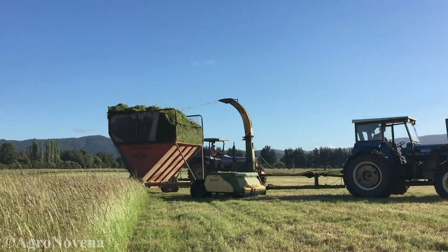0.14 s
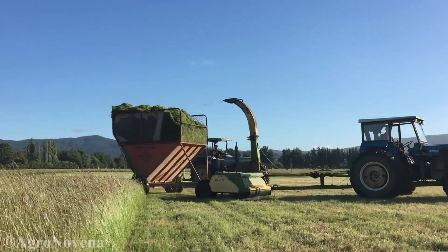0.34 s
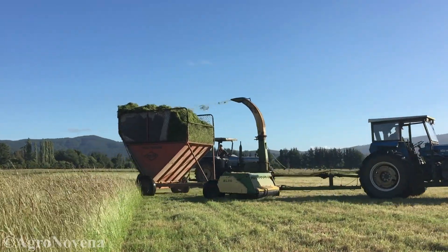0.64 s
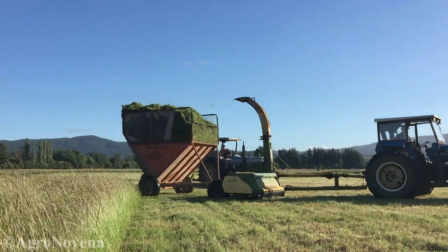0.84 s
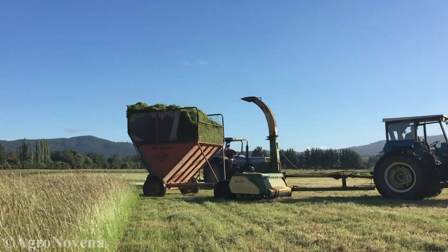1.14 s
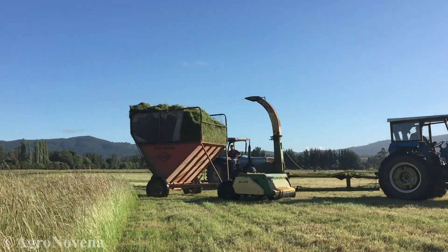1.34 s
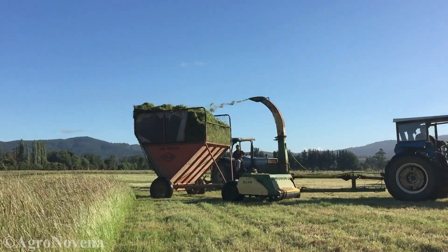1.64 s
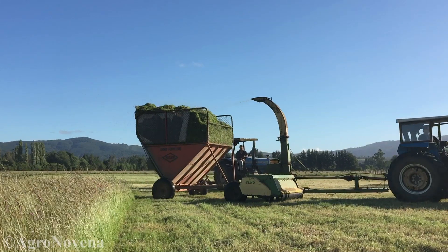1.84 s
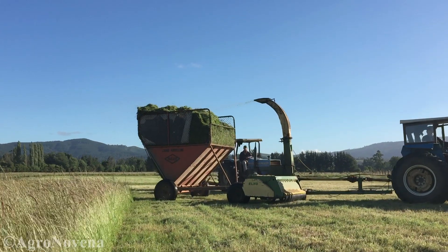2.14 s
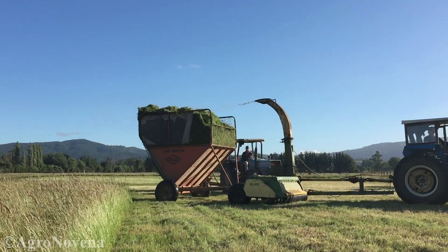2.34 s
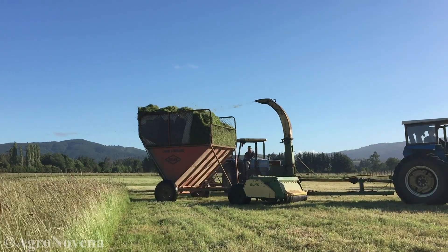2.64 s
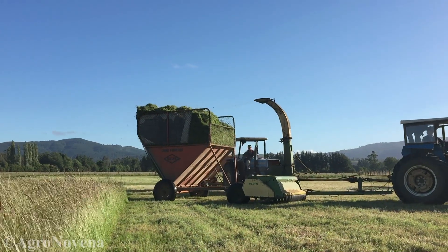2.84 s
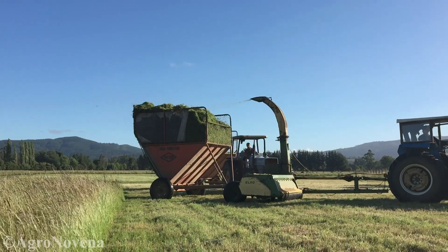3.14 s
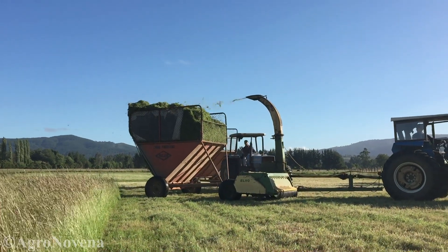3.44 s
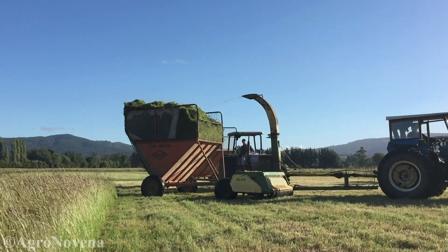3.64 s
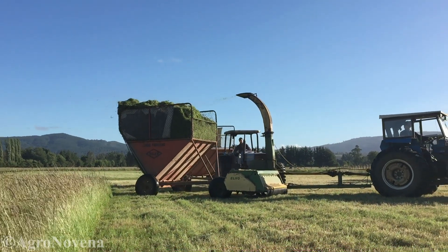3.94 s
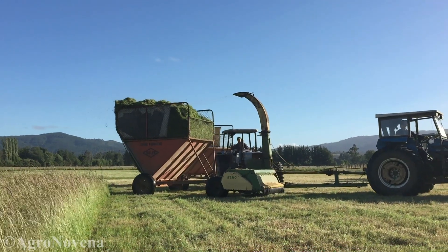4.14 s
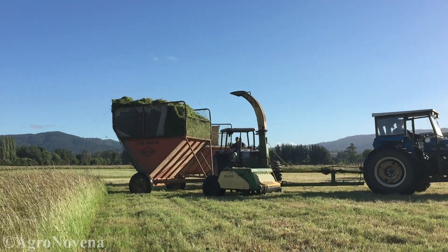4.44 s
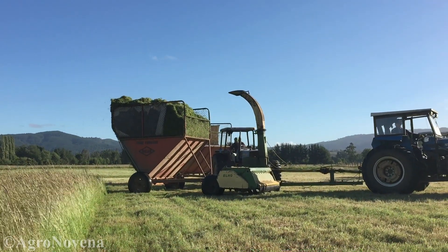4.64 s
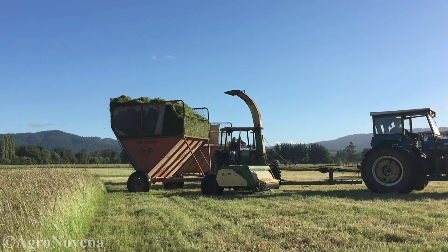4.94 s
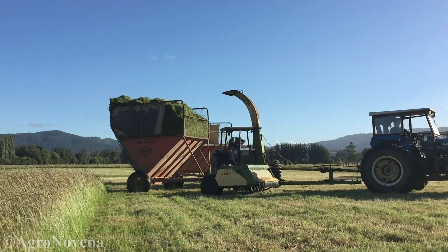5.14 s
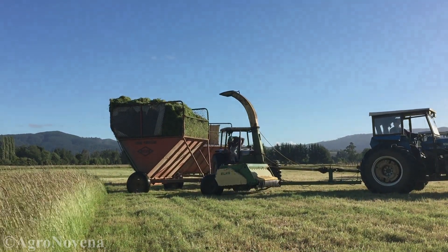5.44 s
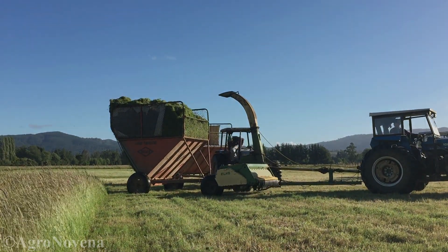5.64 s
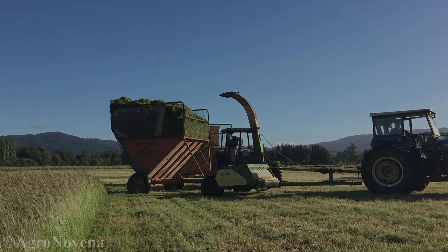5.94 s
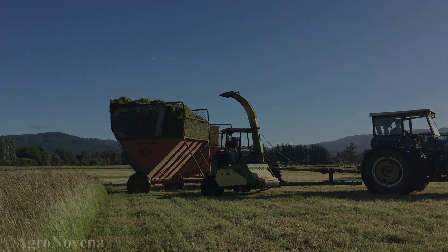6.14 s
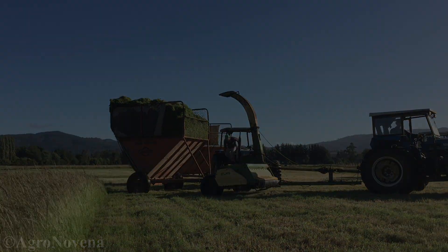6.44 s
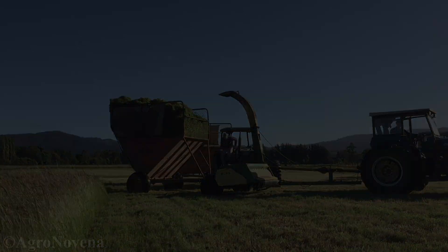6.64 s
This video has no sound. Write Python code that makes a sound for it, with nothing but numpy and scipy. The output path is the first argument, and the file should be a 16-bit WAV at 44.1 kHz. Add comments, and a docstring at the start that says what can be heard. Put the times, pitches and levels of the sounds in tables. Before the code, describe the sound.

Loud tractor engine hum and harvester clatter with bright grass spray, engine speed sagging after two seconds with a few exhaust pops, fading slightly.

```python
"""An engine drones at once, with a chopper's roar, a hum and hissing grass: a diesel tractor tows a forage harvester.
The engine is a row of pressure pulses. It sinks in speed into the tailpipe's resonances, booming and popping.
A second drive hums against it at its own pace. The chopper is noise that partly repeats with the engine.
Cut grass and air are bright noise and patter up the spout. These layers get quieter as the speed falls.
Light air buffets the microphone, and the whole sound fades near the end."""
import sys
import numpy as np
from scipy import signal
from scipy.fft import rfft, irfft, next_fast_len
from scipy.io import wavfile
from scipy.ndimage import uniform_filter1d, map_coordinates

SR = 44100
rng = np.random.default_rng(int(sys.argv[2]) if len(sys.argv) > 2 else 0)


def pcm_store(signal):
    """Save signal as 16-bit PCM."""
    levels = np.round(np.clip(np.atleast_2d(signal), -1, 1) * 32767)
    wavfile.write(sys.argv[1], SR, levels.astype(np.int16).T)


N = 300305

FIRING_HZ = 113.9  # firings per second at full speed
CYLINDERS = 6


def undb(db):
    """Turn decibels into a plain multiplier."""
    return 10 ** (np.asarray(db) / 20)


def unit(x):
    """Scale a signal to an average (rms) level of 1."""
    return x / np.sqrt(np.mean(x ** 2))


def swell(s, half_s):
    """A bell of height 1 around time s, down to about a third half_s away."""
    return np.exp(-((np.arange(N) / SR - s) / half_s) ** 2)


def colour(x, points):
    """Shape a sound's spectrum through (pitch, level) points, then set its rms to 1."""
    hz, db = np.transpose(points)
    size = next_fast_len(N)
    f = np.maximum(np.arange(size // 2 + 1) * SR / size, 1)
    gain = undb(np.interp(np.log(f), np.log(hz), db))
    low_cut = np.minimum(f / hz[0], 1) ** 2  # rolls off below the first point
    return unit(irfft(rfft(x, size) * gain * low_cut, size)[:N])


def walk(rate):
    """A smooth random wander: levels drawn about rate times a second, smoothed twice; rms 1."""
    k = max(int(SR / rate), 2)
    levels = rng.standard_normal(N)[:N // k + 1]
    steps = np.repeat(levels, k)
    smooth = uniform_filter1d(uniform_filter1d(steps, k), k)
    return unit(smooth[:N])


def tones(turns, orders, flutter_db, flutter_rate=14):
    """Pressure troughs at multiples of a turning rate, each wavering in level."""
    total = 0
    for k, db in orders:
        level = undb(db + flutter_db * walk(flutter_rate))
        total = total + level * np.cos(2 * np.pi * k * turns)
    return -np.sqrt(2) * total  # makes each listed level an rms level


def firing_rate():
    """The engine holds its speed, then sinks, quickly at first and ever more gently."""
    sag_start_s, sag_hz_per_s, sag_ease_s = 2.03, 6.64, 9.0
    since = np.maximum(np.arange(N) / SR - sag_start_s, 0)
    return FIRING_HZ - sag_hz_per_s * sag_ease_s * (1 - np.exp(-since / sag_ease_s))


def exhaust(firings, hz, load_db, flutter_db=-0.31, bark_flutter_db=2, jitter=0.018):
    """Firings make pressure troughs; low harmonics boom in the pipe's resonances, load adds a bark."""
    # tailpipe resonances for harmonics 1 to 4: centre_hz, width_hz, level_db at the centre
    resonances = [(99.46, 17.2, -14), (204.8, 51, -18.5), (276.3, 23, -35.5), (415.5, 24, -46)]
    # bark before the load level: multiple of the firing rate, level_db
    bark_orders = [(4, -41.5), (5, -42.5), (6, -42.5), (8, -44), (9, -51), (10, -69)]
    # weak firings: centre_s, share of strength lost (0 to 1)
    stumbles = [(2.697, 0.79), (2.717, 0.76), (2.752, 0.6), (5.57, 0.36), (5.985, 0.44), (6.015, 0.73)]
    pipe_leak_db, stumble_half_s = -27.5, 0.0062  # leak: what passes outside a resonance
    boom = 0
    for k, (centre, width, db) in enumerate(resonances, 1):
        detune = 2 * (k * hz - centre) / width
        resonance_power = 1 / (1 + np.square(detune ** 2))
        gain = np.sqrt(resonance_power + undb(pipe_leak_db) ** 2)
        # the fundamental lags when the engine fires faster than the tailpipe rings
        lag = np.arctan(detune) if k == 1 else 0
        boom = boom - undb(db) * gain * np.cos(2 * np.pi * k * firings - lag)
    # slightly uneven firing roughens the upper harmonics
    bark = tones(firings + jitter * walk(30), bark_orders, bark_flutter_db)
    strength = undb(flutter_db * walk(35))
    for s, lost in stumbles:
        strength = strength * (1 - min(lost, 1) * swell(s, stumble_half_s))
    return strength * (np.sqrt(2) * boom + undb(load_db) * bark)


def gas(firings, pulsing=0.14, waver_db=0.0):
    """Turbulent gas puffs with each firing and rumbles in the pipe; now and then it surges deeper."""
    # steady gas spectrum: pitch_hz, relative level_db per Hz
    gas_colour = [(28, -48), (42, -12.5), (57, -3), (75, -4), (115, -0.5), (145, -2.5), (200, -0.5),
                  (255, -7), (290, -7), (335, -19), (420, -13), (520, -43.5), (900, -81), (3000, -93)]
    # surge spectrum: pitch_hz, relative level_db per Hz
    surge_colour = [(40, -8), (62, 3.5), (130, 5), (300, -19), (700, -45), (2000, -72)]
    # deep surges, mostly with the pops: centre_s, level_db over the steady gas
    surges = [(1.7, -2), (2.78, 0), (3.3, -1), (4.31, 3), (5.65, 4.5), (6.02, -1)]
    puffs = rng.standard_normal(N) * (1 + pulsing * np.cos(2 * np.pi * firings))
    surge_level = sum(undb(db) * swell(s, 0.08) for s, db in surges)
    steady = colour(puffs, gas_colour) * undb(waver_db * walk(4.4))
    return steady + surge_level * colour(rng.standard_normal(N), surge_colour)


def chopper(firings, repeat=0.12, knock=0.044, beat=0.079, flicker_db=0.54, size=2048):
    """Knives and gears: part of the clatter repeats every engine cycle, the rest is fresh turbulence."""
    # roar spectrum: pitch_hz, relative level_db per Hz
    roar_colour = [(250, -4.5), (400, -2), (520, -4), (740, -5), (950, -2.5), (1300, 0), (1500, -0.5),
                   (1680, 0.5), (1950, -3.5), (2480, -8.5), (3200, -7.5), (4000, -14), (4900, -23),
                   (12000, -52)]
    cycles = firings / CYLINDERS
    # read a loop of size random values once a cycle, slightly unevenly
    place = (cycles + 0.00078 * walk(9)) % 1 * size
    clatter = map_coordinates(rng.standard_normal(size), [place], order=3, mode="grid-wrap")
    share = np.clip(repeat, 0, 1)
    rush = np.sqrt(share) * clatter + np.sqrt(1 - share) * rng.standard_normal(N)
    # louder at each firing and at each turn of the shaft, two turns a cycle
    throb = 1 + knock * np.cos(2 * np.pi * firings) + beat * np.cos(2 * np.pi * 2 * cycles)
    return colour(rush * throb, roar_colour) * undb(flicker_db * walk(25.21))


def second_drive(turns):
    """A drive turning at its own steady pace hums at multiples of its turn rate."""
    # hum before the load level: multiple of the turn rate, level_db
    drive_orders = [(3, -32), (5, -35), (9, -44), (15, -42.5), (30, -50.5)]
    return tones(turns, drive_orders, flutter_db=3.8)


def gear_teeth(firings):
    """Meshing teeth whine at multiples of the firing rate, so they sink with the engine."""
    # whine before the load level: multiple of the firing rate, level_db
    gear_orders = [(11.62, -45), (20.36, -51), (28.16, -64)]
    return tones(firings, gear_orders, flutter_db=5)


def blower(turns, pulsing=0.24, flicker_db=1.0, count=5):
    """Air hisses up the spout, pulsing count times a turn of the second drive."""
    # hiss spectrum: pitch_hz, relative level_db per Hz
    air_colour = [(3500, 1), (5300, -3), (7000, -4.5), (7600, -9), (9600, -13), (11000, -12.5),
                  (15500, -35)]
    air = rng.standard_normal(N) * (1 + pulsing * np.cos(2 * np.pi * count * turns))
    return colour(air, air_colour) * undb(flicker_db * walk(50))


def grass(grains_per_s=1800, spread_db=4.5, patter_db=-3):
    """Chopped stalks rustle as steady noise and patter on the spout as random clicks."""
    # rustle and patter spectrum: pitch_hz, relative level_db per Hz
    grass_colour = [(4000, 0.5), (8000, 4.7), (11500, 1.5), (15500, 1.4)]
    hits = rng.random(N) < grains_per_s / SR
    signs = rng.choice([-1, 1], N)
    sizes = undb(spread_db * np.minimum(rng.exponential(size=N), 6))
    patter = unit(hits * signs * sizes)
    return colour(rng.standard_normal(N) + undb(patter_db) * patter, grass_colour)


def wads():
    """Thick wads of grass going up the spout raise the spray's level, in decibels."""
    # wads: centre_s, extra spray level_db
    wad_list = [(0.72, 6.5), (1.55, 1.5), (2.2, 1.5), (2.76, 3.8)]
    return sum(db * swell(s, 0.21) for s, db in wad_list)


def breeze():
    """Light air buffets the microphone as a low rumble."""
    # rumble spectrum: pitch_hz, relative level_db per Hz
    breeze_colour = [(24, -25), (38, -3), (52, 0), (75, 6), (160, -25), (600, -85)]
    # strength over time: time_s, level_db
    breeze_levels = [(0, -56), (2.3, -46), (2.9, -30), (5.2, -33), (5.7, -27), (6.81, -30)]
    level_db = np.interp(np.arange(N) / SR, *np.transpose(breeze_levels))
    return colour(rng.standard_normal(N), breeze_colour) * undb(level_db)


def rings():
    """Narrow resonances in the machinery, shaken at random, swell and fade."""
    # rings: centre_s, half_length_s, pitch_hz, width_hz (also the shaking rate), level_db
    ring_list = [(.5, 0.56, 917, 32, -38.5), (5.2, 0.85, 1110, 18, -43.5), (5.958, 0.42, 1647, 80, -43)]
    out, t = 0, np.arange(N) / SR
    for s, half, hz, width_hz, db in ring_list:
        phase = 2 * np.pi * hz * t
        fade = np.exp(-np.square(((t - s) / half) ** 2))
        shaken = walk(width_hz) * np.sin(phase) + walk(width_hz) * np.cos(phase)
        out = out + undb(db) * fade * shaken
    return out


def ticks(decay_s=.00015):
    """Stalks and grit striking the spout give short bright rings that die at once."""
    # ticks: start_s, level_db before the decay, pitch_hz
    tick_list = [(1.625, -20, 12500), (2.657, -24, 11000), (3.068, -31, 11000), (4.037, -29, 9500),
                 (4.222, -33, 10000), (4.767, -33, 9000)]
    out, t = np.zeros(N), np.arange(SR // 100) / SR
    for s, db, hz in tick_list:
        i = int(s * SR)
        out[i:i + len(t)] += undb(db) * np.sin(2 * np.pi * hz * t) * np.exp(-t / decay_s)
    return out


def pops(sag=1.15, sag_s=.0022, rise_s=.0007):
    """Each exhaust pop rings the pipe briefly, dropping in pitch to its listed value."""
    # pops: start_s, peak level_db, final pitch_hz, decay_s
    pop_list = [(2.681, -19, 450, .0015), (2.6935, -5, 260, .005), (2.713, -20, 420, .0015),
                (2.726, -9, 110, .009), (2.763, -12, 110, .009), (4.2685, -11.5, 190, .004),
                (5.586, -18, 230, .004), (5.662, -23, 400, .003), (5.9935, -18, 270, .003),
                (6.0125, -17.5, 215, .004)]
    out, t = np.zeros(N), np.arange(SR // 20) / SR
    for s, db, hz, decay in pop_list:
        cycles = hz * (t + sag * sag_s * (1 - np.exp(-t / sag_s)))
        envelope = (1 - np.exp(-t / rise_s)) ** 2 * np.exp(-t / decay)
        ring = np.sin(2 * np.pi * cycles) * envelope
        i = int(s * SR)
        out[i:i + len(t)] += undb(db) * ring / np.abs(ring).max()
    return out


def scene(clump_db=0.8):
    """Engine speed sets pitch and level of many layers; the second drive keeps its own pace."""
    hz = firing_rate()
    slowing = np.log2(FIRING_HZ / hz)  # octaves under full speed
    firings = np.cumsum(hz) / SR
    turns = 23.39 * np.arange(N) / SR  # second drive, turns per second
    # each layer: level in dB at full speed, less the dB lost per octave of slowing
    load_db = 0.5 - 53 * slowing  # exhaust bark, gears and second drive
    gas_db = -23.5 - 17.5 * slowing
    roar_db = -25.5 - 23.5 * slowing
    air_db = -40.5 - 36.5 * slowing
    spray_db = -46 - 46.5 * slowing + wads()
    tractor = exhaust(firings, hz, load_db) + gas(firings) * undb(gas_db) + pops()
    cutting = chopper(firings) * undb(roar_db) + rings()
    air = blower(turns) * undb(air_db)
    spray = grass() * undb(spray_db)
    # small clumps make the flow up the spout flicker
    spout = (air + spray) * undb(clump_db * walk(150)) + ticks()
    # the drive's fifth multiple lies near the firing rate and beats against it
    hum = second_drive(turns) + gear_teeth(firings)
    return (tractor + cutting + spout + hum * undb(load_db) + breeze())[None]


def record(dry, notch_hz=10400, notch_q=14, notch_depth=0.49):
    """The microphone port dips a narrow treble band; the sound fades in and out, and the top is cut."""
    fade_in_s, fade_start_s, fade_db_per_s = .002, 6, 4
    top_hz = 15700
    t = np.arange(N) / SR
    notched = signal.lfilter(*signal.iirnotch(notch_hz, notch_q, fs=SR), dry)
    fade_out = undb(-fade_db_per_s * np.maximum(t - fade_start_s, 0))
    fade = np.minimum(t / fade_in_s, 1) * fade_out
    heard = (dry + notch_depth * (notched - dry)) * fade  # only part of the notch is mixed in
    return signal.sosfilt(signal.ellip(10, .2, 80, top_hz, fs=SR, output="sos"), heard)


dry = scene()
out = record(dry)
pcm_store(out)
```